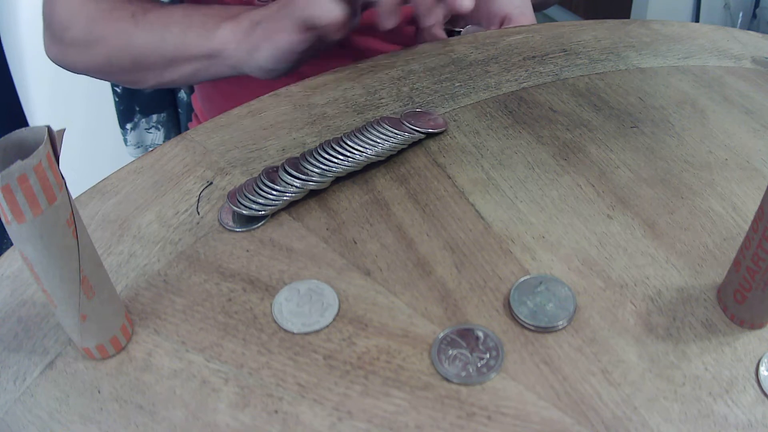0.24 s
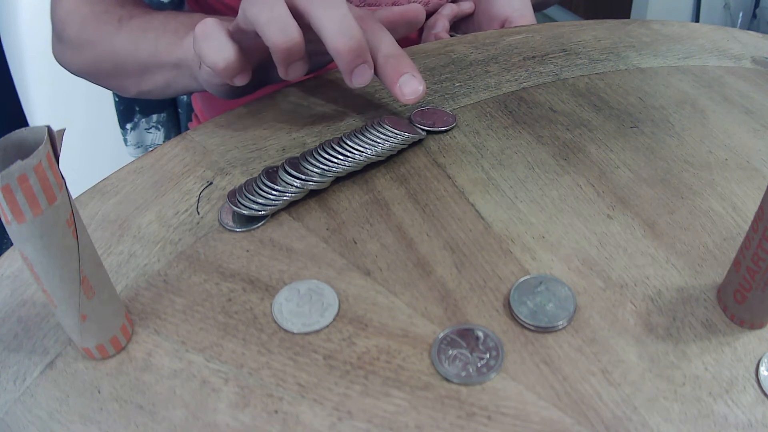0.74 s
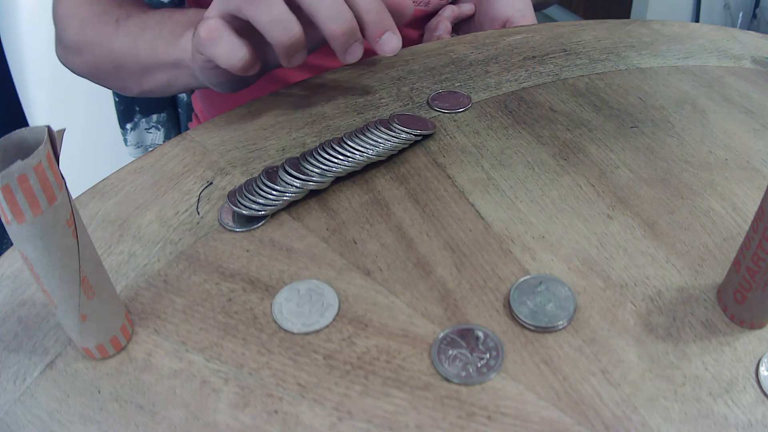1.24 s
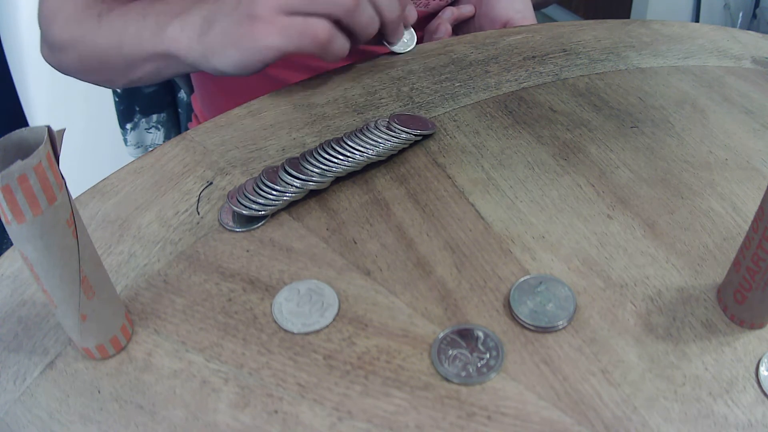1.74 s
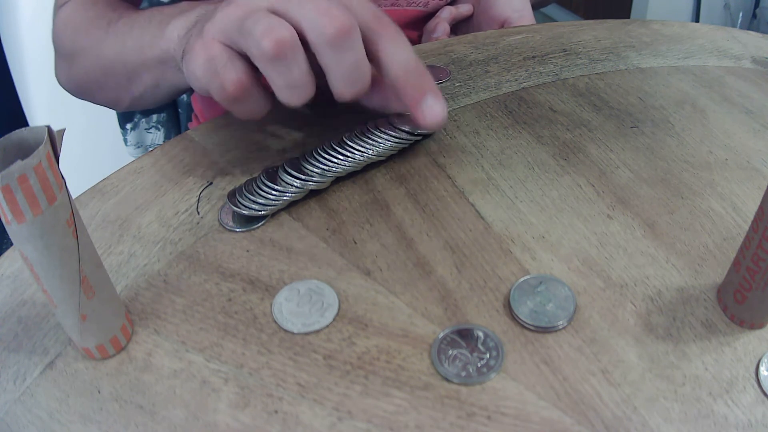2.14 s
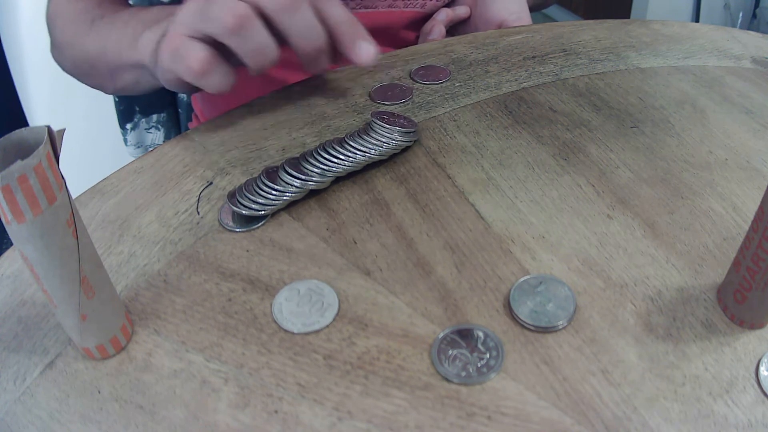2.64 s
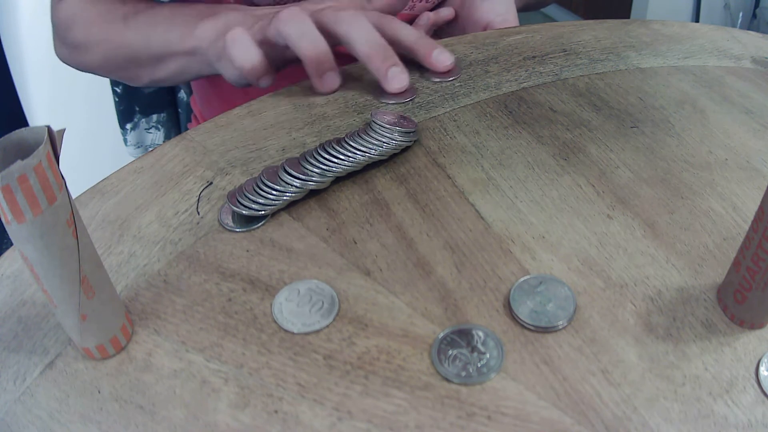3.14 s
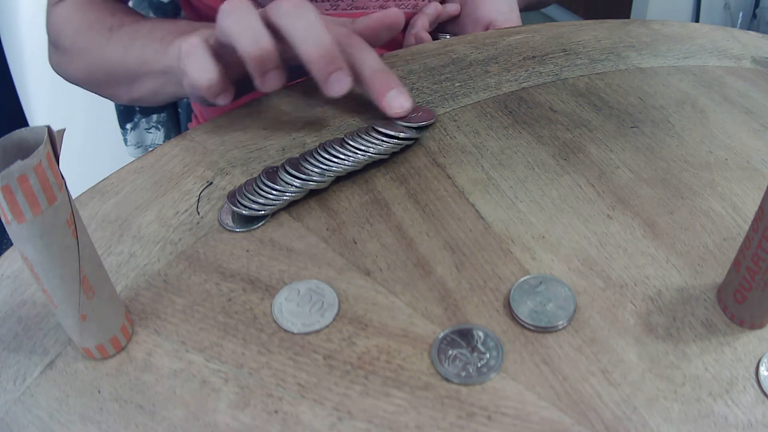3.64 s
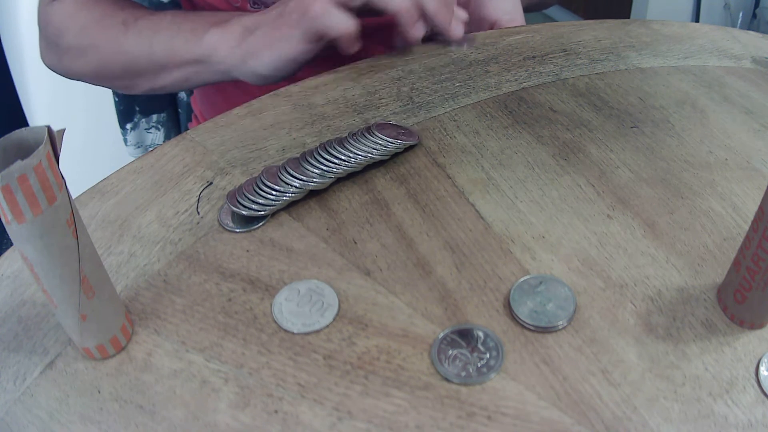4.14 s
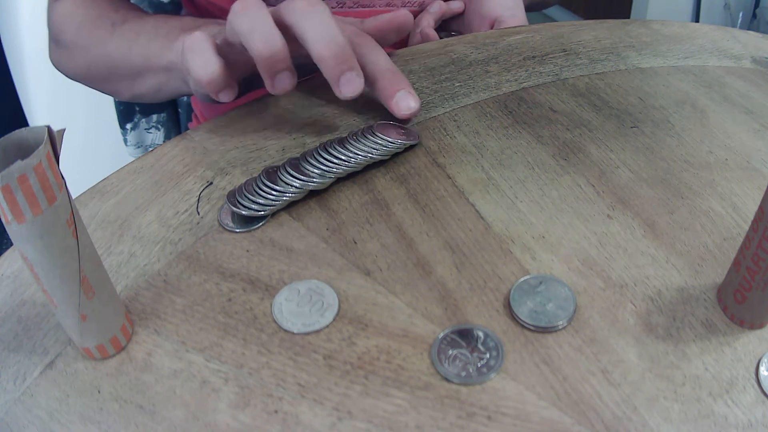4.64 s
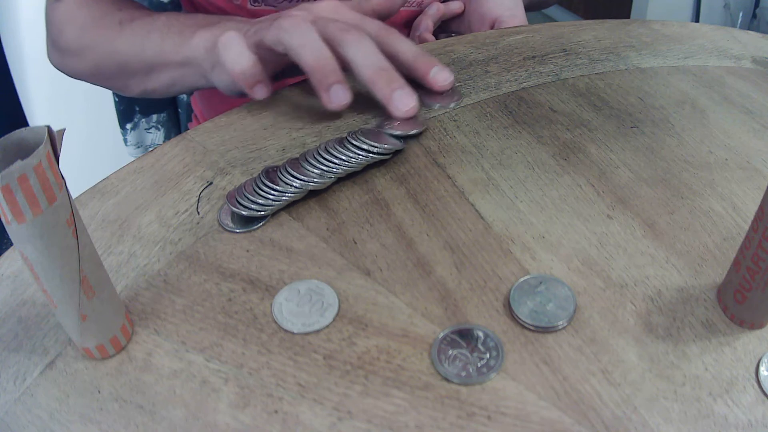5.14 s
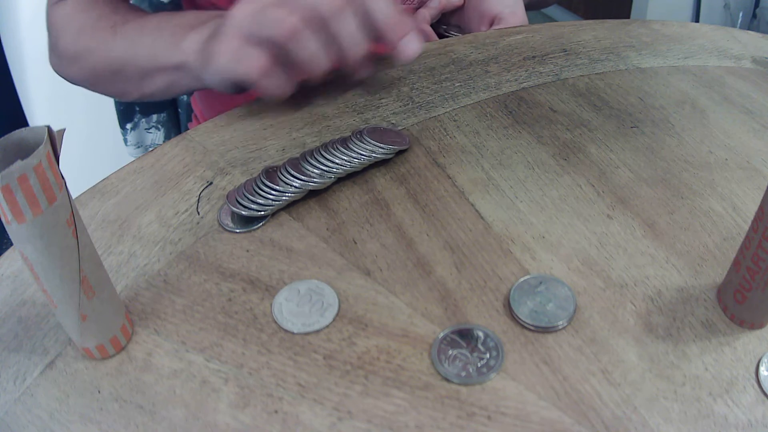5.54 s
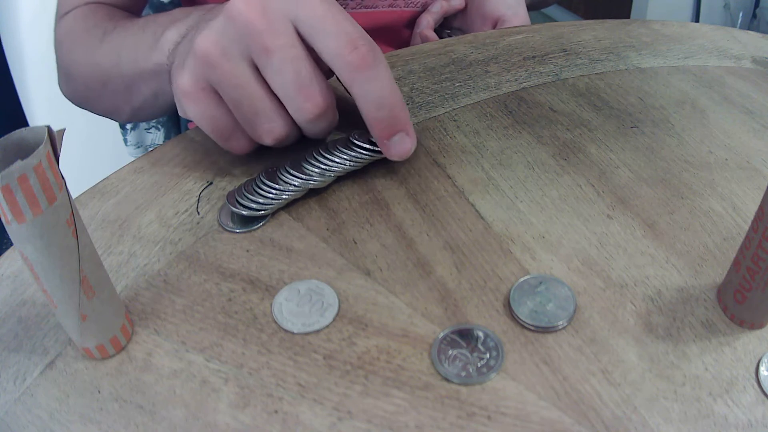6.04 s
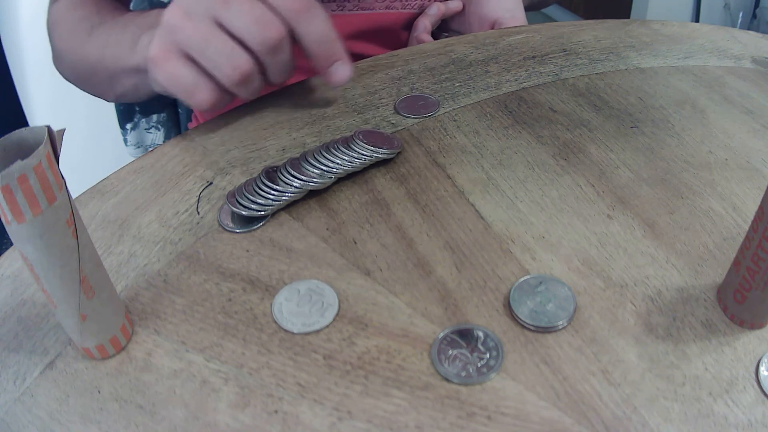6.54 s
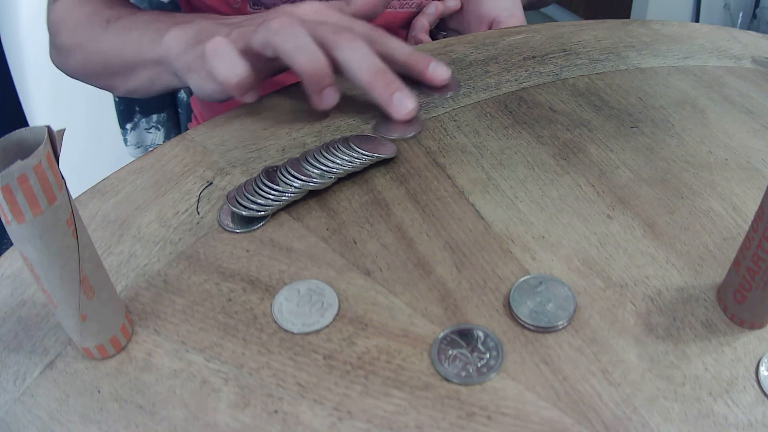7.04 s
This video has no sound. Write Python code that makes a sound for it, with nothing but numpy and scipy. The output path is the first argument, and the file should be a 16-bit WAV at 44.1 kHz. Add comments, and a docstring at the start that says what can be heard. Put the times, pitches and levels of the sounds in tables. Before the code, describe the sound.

Coins are handled close by on a wooden table in a small room, over a faint, steady machine hum with a thin whine. At the start come light ticks and a short slide, then a bright clink of coins in a hand at 0.2 seconds. Near 1 second a coin knocks against the stack and taps sharply onto the wood. A scrape at 1.6 is followed by a tap near 2 and a cluster of knocks and taps until 2.6. Another slide ends in a clink at 3.4. Thin rasps, knocks and taps run from 3.6 to 4, with a slide and clink at 4.2. The pattern repeats from 4.8, clinking at 5.4. After soft ticks, a coin lands around 6.3, wobbles in quickening, fading bounces and slides briefly. A last rasp and tap come at about 7.1 seconds.

```python
"""A wooden table in a small room, with a machine humming faintly behind.
Coins are pushed one by one off a leaning stack: they tick and knock, and their milled rims rasp.
Each taps down and sets the table top ringing, is slid over the grain to the edge, and drops with a
bright clink onto the coins in the other hand. One wobbles in quickening bounces before it lies flat."""
import sys
import numpy as np
from scipy import signal
from scipy.fft import rfft, irfft
from scipy.io import wavfile

SR = 44100
rng = np.random.default_rng(int(sys.argv[2]) if len(sys.argv) > 2 else 0)


def to_wav(sig):
    """Store sig (one row per channel, or 1-D mono) as 16-bit WAV at the path in sys.argv[1].

    Samples outside -1..1 are clipped; the rate is SR.
    """
    pcm = np.clip(np.atleast_2d(sig), -1, 1) * 32767
    pcm = np.round(pcm).astype(np.int16)
    wavfile.write(sys.argv[1], SR, pcm.T)  # frames by channels


N = 321930
TIME = np.arange(N) / SR
HIT_TIME = np.arange(SR // 4) / SR

# the machine's low rotation tones and thin whine: pitch_hz, rms_db
MOTOR_TONES = [(29.5, -55), (44.8, -59), (59.2, -51), (74.5, -56), (90.4, -62), (119, -67.5)]
WHINE_TONES = [(186.4, -59.5), (297, -64), (473.7, -68.5), (596.4, -50), (1432, -67.5), (2310.7, -54.5)]
# early reflections off nearby surfaces: delay_s, level_db
ECHOES = [(.0098, -16), (.0125, -16), (.0165, -15), (.0238, -20)]

# tone colours, as EQ curves: frequency_hz, level_db
AIR_EQ = [(20, 2.5), (45, 6.5), (80, 2.5), (110, -8), (250, -13), (600, -15), (1200, -15), (1800, -15),
          (2550, -12.5), (3100, -24.5), (5000, -29), (8000, -33), (12000, -32.5), (16000, -33.5)]  # moving air
WALL_EQ = [(200, 10), (1000, 10), (2500, 3.2), (6500, 8.4), (10000, 8.8), (16000, 7.7)]  # the room's tail
GRIND_EQ = [(200, -16.5), (400, -15.5), (1000, -10.5), (1900, -5.5), (2600, -10), (4000, -18.5),
            (6000, -26), (15000, -39.5)]  # grinding heard through the stack
RASP_EQ = [(1000, -13), (6000, 4.5), (9000, 2.5), (11400, 5), (13000, 8), (15500, 2)]  # milled rim on milled rim
RUB_EQ = [(300, -16), (850, -5), (1300, -0.5), (2100, 3.5), (2900, -1), (3700, -4), (4500, -11),
          (5300, -13.5), (6200, -14.5), (8000, -22), (12000, -25.5), (15500, -38)]  # coin rubbing on wood
KNOCK_EQ = [(200, -22), (400, -24), (700, -15.5), (1200, -9.5), (2100, 0), (2800, -1), (3700, -3.5),
            (5000, -4), (7000, -9), (9000, -45), (16000, -67)]  # the wood's short knock
THUD_EQ = [(120, -31), (300, -3), (410, 0), (600, -9), (950, 4), (1800, -40.5)]  # the table's low thud
EDGE_EQ = [(2000, -18.5), (3100, -4), (4300, 0.5), (5600, -17.5), (7200, -1), (10000, -13), (16000, -41)]  # a coin's hard edge
CRACK_EQ = [(200, -25), (400, -8.5), (1000, -11), (2500, -7.5), (4200, -1), (6200, -4.5), (8000, -0.5),
            (10000, 1), (11400, 2), (13000, 3), (15500, 2)]  # bright crack of metal

# ringing modes: pitch_hz, level_db, t60_s
WOOD_MODES = [(412, -7.5, 0.048), (812, -9.5, 0.081), (998, -2.5, 0.046), (1464, 3, 0.024),
              (1982, 1.5, 0.073), (2130, 5, 0.01), (2490, 5.5, 0.042), (2474, -2, 0.031), (3130, -6, 0.069),
              (3725, -0.5, 0.079)]  # the table top under a coin
COIN_MODES = [(10600, -13, .05), (11090, -1, 0.099), (11360, 11, 0.071), (11320, 3.5, 0.053),
              (11830, 0, 0.05), (10900, -12, 0.12), (11400, -13, 0.065), (11700, -13, 0.067),
              (11400, -17, .1)]  # lowest bending mode, a little different from coin to coin

# coins shift in the stack: start_s, level_db
TICKS = [(0.065, -19), (0.0944, -18.5), (0.111, -20.5), (2.238, -22.5), (2.2942, -27), (3.612, -22.5),
         (5.0944, -22.5), (5.145, -21.5), (5.2019, -12.5), (5.837, -25.5), (5.88, -29)]
# a coin is pushed over the stack until it tips off: start_s, end_s, final_grind_db, final_rasp_db
PUSHES = [(0.946, 0.97, -33, -42), (2.282, 2.322, -31, -38), (3.607, 3.77, -29.5, -38),
          (3.895, 4.011, -33.5, -47), (4.817, 4.943, -32.5, -42.5), (5.079, 5.194, -33, -44),
          (6.986, 7.08, -28, -36.5)]
# a coin slides on the wood: last_catch_s, speeding_s, slowing_s, fastest_db, catch_boost_db; the last row is
# the wobbling coin's rim rolling on the wood between its bounces
SLIDES = [(0.143, .02, .12, -30.5, 7.5), (1.708, .085, 0.073, -26, -0.5), (1.935, .03, .035, -42, -4),
          (2.495, .022, .033, -45, -4), (3.321, .05, 0.089, -32.5, 2.5), (4.15, .02, .11, -31, 5.5),
          (5.378, .1, 0.14, -29, 4), (6.553, .01, 0.15, -31, -2)]
# a coin knocks against the stack: start_s, level_db, relative_ring_db
KNOCKS = [(0.938, -16, -25), (0.96, -13, -22), (0.98, -8.5, -7), (2.193, -17, -28), (2.242, -14.5, -30),
          (2.3135, -8.5, -15), (2.341, -5, -5.5), (3.635, -3.5, -17), (3.975, -12, -19), (4.858, -12, -31),
          (4.896, -21, -29), (6.196, -17, -14), (6.239, -25.5, -30)]
# a coin lands on the wood: start_s, level_db, spot_hz,
# then trims on that level: thud_db, edge_db, crack_db, ring_db, rebound_db
LANDINGS = [(0.001, -11, 2170, -10.5, -4.5, -1.5, -23, -12), (0.97, 3, 2070, -25, -9, -8.5, -26, -30),
            (1.834, -16, 1000, -12, -45, -40, -45, -12), (1.951, 1.5, 1890, -30, -12, -14.5, -40, -22),
            (2.428, -8, 1890, -22, -45, -40, -31, -15), (2.555, -2, 3100, -19, -4, -10, -5.5, -6),
            (3.72, -5.5, 2230, -26, -9, -10, -11, -1), (4.012, 1.5, 2240, -28, -10.5, -16.5, -20, -13),
            (4.952, -6.5, 2920, -24, -9, -19, -11.5, -9), (5.207, -4, 2260, -15, -5.5, -26, -17, -23),
            (6.283, -2, 2380, -24, -32, -48, -50, -25), (6.383, 0, 2120, -51, -14.5, -15, -29, -20),
            (7.086, -3, 2150, -20, -8.5, -28, -21, -26)]
# a coin hits the loose coins in the hand: start_s, level_db, rattle_s
CLINKS = [(0.1931, -7.5, .012), (0.2237, 0, 0.011), (0.263, -11, 0.016), (0.307, -11.5, .025),
          (3.356, -3, 0.021), (3.373, -9, 0.018), (3.3891, -1, 0.0095), (3.3968, -1, .036),
          (3.4668, -14, .01), (4.2276, -4.5, .012), (4.2372, -3, 0.021), (4.2675, -7, .02),
          (4.2828, -8.5, .015), (4.3138, -12.5, .025), (5.4019, -9.5, 0.0095), (5.4113, -4.5, 0.026),
          (5.447, -7.5, .012), (5.4557, -7, 0.014)]


def from_db(db):
    """Decibels to gain."""
    return 10 ** (np.asarray(db) / 20)


def unit(x):
    """Scale to an energy of 1."""
    return x / np.sqrt(np.sum(x ** 2) + 1e-20)


def add(track, start_s, sound):
    """Mix a sound into a track at its cue."""
    start = max(round(start_s * SR), 0)
    track[start:start + len(sound)] += sound[:max(N - start, 0)]


def through(x, response):
    """Pass a sound through an impulse response, keeping its length."""
    return signal.fftconvolve(x, response)[:len(x)]


def colour(eq, size=8192):
    """Turn an EQ curve into a minimum-phase impulse response; energy 1."""
    hz, db = np.transpose(eq)
    grid_hz = np.maximum(np.arange(size // 2 + 1) * SR / size, 1)
    gain = from_db(np.interp(np.log(grid_hz), np.log(hz), db))
    cepstrum = irfft(np.log(gain))
    return unit(irfft(np.exp(rfft(2 * cepstrum[:size // 2], size))))


def butterworth(x, hz, kind, order):
    """A gentle low-pass or high-pass."""
    return signal.sosfilt(signal.butter(order, min(hz, .45 * SR), kind, fs=SR, output="sos"), x)


def lift(x, hz, width_hz, db):
    """Add a resonance: a band of the sound, mixed back in at db."""
    return x + from_db(db) * signal.lfilter(*signal.iirpeak(hz, hz / width_hz, fs=SR), x)


def fade(t60):
    """Free decay, 60 dB in t60 seconds."""
    return from_db(-60 * HIT_TIME / t60)


def even_noise(envelope):
    """Noise with a flattened spectrum under an envelope; energy 1."""
    noise = rng.standard_normal(len(envelope)) * envelope
    for _ in range(2):
        spectrum = rfft(noise, 2 * len(noise))
        flattened = irfft(spectrum / (np.abs(spectrum) + 1e-12))
        noise = flattened[:len(noise)] * np.sqrt(envelope)
    return unit(noise)


def burst(t60):
    """Countless damped modes struck at once."""
    return even_noise(fade(t60))


def ring(modes, detune, spread_db=2):
    """One blow on a set of modes, each with its own strength, detuning and polarity; energy 1."""
    out = np.zeros(len(HIT_TIME))
    for hz, db, t60 in modes:
        strength, shift, polarity = rng.standard_normal(3)
        tone = np.sign(polarity) * np.sin(2 * np.pi * hz * (1 + detune * shift) * HIT_TIME)
        out += from_db(db + spread_db * strength) * fade(t60) * tone
    return unit(out)


def grains(per_s, spread_db):
    """Friction texture: tiny slips of uneven size at random moments; rms 1."""
    sizes = from_db(spread_db * np.minimum(rng.exponential(1, N), 4))
    polarity = rng.choice([-1, 1], N)
    slipping = rng.random(N) < per_s / SR
    return unit(sizes * polarity * slipping) * np.sqrt(N)


def stroke(friction, envelope):
    """Cut one gesture from a friction texture along breakpoints of time_s, level_db."""
    times_s, db = np.transpose(envelope)
    moving = (TIME >= times_s[0]) & (TIME < times_s[-1])
    return friction[moving] * from_db(np.interp(TIME[moving], times_s, db))


def machine_hum(air_db=-43.5, waver_cycles=.11):
    """The bed: a machine's low rotation tones and thin whine, slightly unsteady, over moving air."""
    out = from_db(air_db) * through(rng.standard_normal(N), colour(AIR_EQ))
    knots_s = np.arange(0, TIME[-1] + 1, .5)
    for hz, db in [*MOTOR_TONES, *WHINE_TONES]:
        cycles = hz * TIME + rng.random()
        waver = waver_cycles * np.interp(TIME, knots_s, rng.standard_normal(len(knots_s)))
        out += np.sqrt(2) * from_db(db) * np.sin(2 * np.pi * (cycles + waver))
    return out


def room(x, tail_db=-6, t60=.31, build_up_s=.005):
    """A few close echoes and a short diffuse tail, scattered afresh on every call."""
    build_up = 1 - np.exp(-(HIT_TIME / build_up_s) ** 2)
    tail = even_noise(fade(t60) * build_up)
    response = from_db(tail_db) * unit(through(tail, colour(WALL_EQ)))
    for delay_s, db in ECHOES:
        response += from_db(db) * np.roll(burst(t60=.011), round(delay_s * SR))
    return x + through(x, response)


def table_spot(x, hz, trim_db=-4, width_hz=710, band_db=-2.5, overtone_ratio=1.996):
    """Lift the two bands that one spot of the table top favours."""
    lifted = lift(x, hz, width_hz, band_db)
    return from_db(trim_db) * lift(lifted, hz * overtone_ratio, width_hz, band_db)


def ticks(gain_db=8):
    """Coins damped by the finger cannot ring: only the dry snap of rim on rim."""
    out = np.zeros(N)
    snap = colour([(500, 8), (2500, 2), (6000, -7), (9000, -3.5), (13000, 2), (16000, -.5)])
    for start_s, db in TICKS:
        contact = unit(burst(t60=.004) + burst(t60=.03))
        add(out, start_s, from_db(db + gain_db) * through(contact, snap))
    return out


def pushes(grind_trim_db=-2, rasp_trim_db=-3, onset_db=-12, attack_s=.016, swell_db_per_s=81):
    """Milled rims bump harder as the finger presses: a thin rasp, and a dull grind through the stack."""
    out, grind, rasp = np.zeros(N), colour(GRIND_EQ), colour(RASP_EQ)
    ridges = grains(per_s=800, spread_db=1.5)
    for start_s, end_s, grind_db, rasp_db in PUSHES:
        first_db = -swell_db_per_s * (end_s - start_s)
        force = stroke(ridges, [(start_s, first_db + onset_db), (start_s + attack_s, first_db),
                                (end_s, 0)])
        response = from_db(grind_db + grind_trim_db) * grind + from_db(rasp_db + rasp_trim_db) * rasp
        add(out, start_s, signal.fftconvolve(force, response))
    return out


def slides(rub_db=-3, wood_db=-10, rise_db=16.5, slowing_db_per_s=46,
           stall_s=.026, stall_db=-10, release_s=.02):
    """Wood grain grips the coin in tiny slips; it speeds up, slows, stalls and catches once more."""
    out, rub = np.zeros(N), colour(RUB_EQ)
    slips = grains(per_s=2000, spread_db=3.5)
    for catch_s, speeding_s, slowing_s, fastest_db, catch_db in SLIDES:
        start_s = catch_s - slowing_s - speeding_s
        slow_db = fastest_db - slowing_db_per_s * slowing_s
        force = stroke(slips, [(start_s, fastest_db - rise_db), (catch_s - slowing_s, fastest_db),
                               (catch_s - stall_s, slow_db), (catch_s - stall_s / 2, slow_db + stall_db),
                               (catch_s, slow_db + catch_db), (catch_s + release_s, slow_db - rise_db)])
        # each stroke crosses another spot and favours other modes of the table
        table = from_db(wood_db) * ring(WOOD_MODES, detune=.03)
        add(out, start_s, from_db(rub_db) * signal.fftconvolve(force, rub))
        add(out, start_s, signal.fftconvolve(force, table))
    return table_spot(out, hz=2060, trim_db=-3.5)


def coin_ring(coins):
    """High shimmer: touching coins ring together and beat against each other; energy 1."""
    return unit(sum(ring(COIN_MODES, detune=.007) for _ in range(coins)))


def tap(thud_db, edge_db, crack_db, ring_db, delay_s=.001):
    """One blow of a coin in the room, wood below and metal on top; the levels trim a base mix."""
    table = from_db(4) * ring(WOOD_MODES, detune=.03)
    knock = from_db(10) * through(burst(t60=.036), colour(KNOCK_EQ))
    top_hz = 8000 * from_db(.3 * edge_db)  # a soft landing loses its top
    body = butterworth(knock + table, top_hz, "low", order=2)
    thud = from_db(16 + thud_db) * through(burst(t60=.074), colour(THUD_EQ))
    snap = burst(t60=.006)
    edge = from_db(12 + edge_db) * through(snap, colour(EDGE_EQ))
    crack = from_db(13 + crack_db) * through(unit(snap + burst(t60=.078)), colour(CRACK_EQ))
    shimmer = from_db(10 + ring_db) * coin_ring(coins=2)
    return room(np.pad(body + thud + edge + crack + shimmer, (round(delay_s * SR), 0)))


def knocks():
    """The heavy stack passes a blow to the table as a dull thud, with a crack of metal on top."""
    out = np.zeros(N)
    for start_s, db, ring_db in KNOCKS:
        add(out, start_s, from_db(db) * tap(thud_db=-16.5, edge_db=-34, crack_db=-10, ring_db=ring_db))
    return out


def wobble(start_s=6.407, bounces=6, first_gap_s=.0372, haste_s=.0052, gain_db=-3, loss_db=2.07):
    """A coin rocks flat on its rim, every bounce sooner and weaker than the one before."""
    out, cue_s = np.zeros(N), start_s
    for k in range(bounces):
        bounce = tap(thud_db=-33, edge_db=-15.5, crack_db=-27, ring_db=-22)
        add(out, cue_s, from_db(gain_db - loss_db * k) * table_spot(bounce, hz=2130))
        cue_s += first_gap_s - haste_s * k
    # a light rocking rim hardly stirs the table's low end
    return butterworth(out, hz=1000, kind="high", order=1)


def landings(rebound_s=.02):
    """A coin strikes the wood with its rim and rebounds once."""
    out = np.zeros(N)
    for start_s, db, spot_hz, thud_db, edge_db, crack_db, ring_db, rebound_db in LANDINGS:
        for cue_s, level_db in ((start_s, db), (start_s + rebound_s, db + rebound_db)):
            blow = tap(thud_db, edge_db, crack_db, ring_db)
            add(out, cue_s, from_db(level_db) * table_spot(blow, spot_hz))
    return out


def rattle(start_s, db, rattle_s, rebounds=2, rebound_db=-9, fade_db_per_s=100):
    """Cues for a hit and its uneven, fading rebounds: start_s, level_db."""
    steps = np.arange(1, rebounds + 1) + rng.uniform(-.25, .25, rebounds)
    after_s = rattle_s * steps / rebounds
    return [(start_s, db), *zip(start_s + after_s, db + rebound_db - fade_db_per_s * after_s)]


def clinks(crack_db=10.5, ring_db=10, snap_db=-2, chatter_hz=5050):
    """Coin on coin in the hand: a bright crack, a brief chatter and the high ring of bending metal."""
    out, crack_colour = np.zeros(N), colour(CRACK_EQ)
    for clink in CLINKS:
        for cue_s, db in rattle(*clink):
            contact = unit(from_db(snap_db) * burst(t60=.008) + burst(t60=.11))
            # coins lying face to face buzz in a band of their own at each hit
            contact = lift(contact, chatter_hz * 2 ** rng.uniform(-.2, .2), width_hz=450, db=-1.5)
            crack = from_db(crack_db) * through(contact, crack_colour)
            shimmer = from_db(ring_db) * coin_ring(coins=3)
            add(out, cue_s, from_db(db) * room(crack + shimmer))
    return out


def scene():
    """The mono mix: coins over the hum, with the friction closer and drier than the hits."""
    hits = landings() + wobble() + knocks() + clinks() + room(ticks())
    friction = room(slides(), tail_db=-9.5) + room(pushes(), tail_db=-8)
    return (hits + friction + machine_hum())[None]


def record(dry):
    """The microphone rounds off the hardest peaks; a steep low-pass cuts the very top."""
    ceiling, cutoff_hz = .43, 15900
    rounded = dry / (1 + (dry / ceiling) ** 4) ** (1 / 4)
    return signal.sosfilt(signal.ellip(12, .1, 80, cutoff_hz, fs=SR, output="sos"), rounded)


dry = scene()
out = record(dry)
to_wav(out)
```